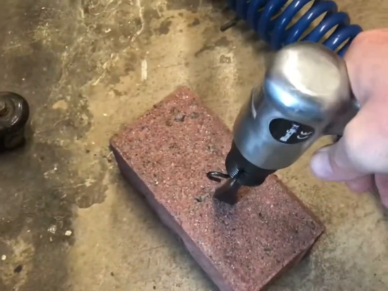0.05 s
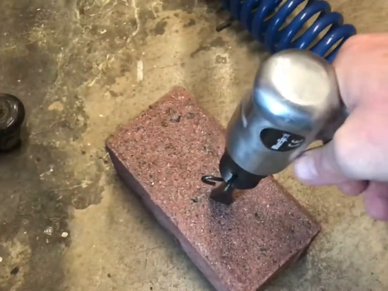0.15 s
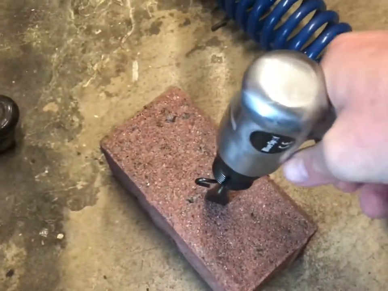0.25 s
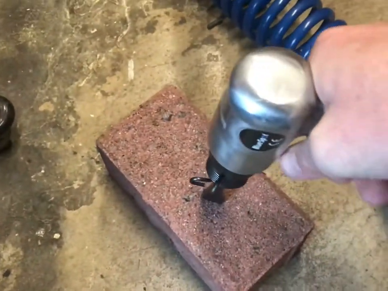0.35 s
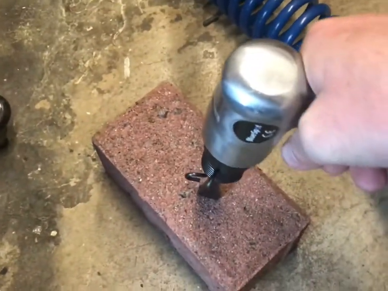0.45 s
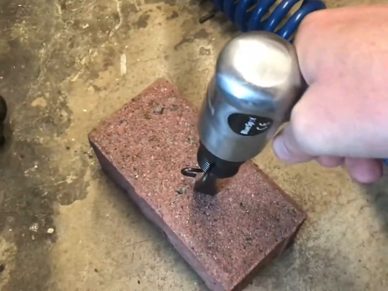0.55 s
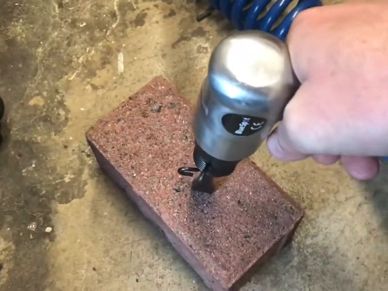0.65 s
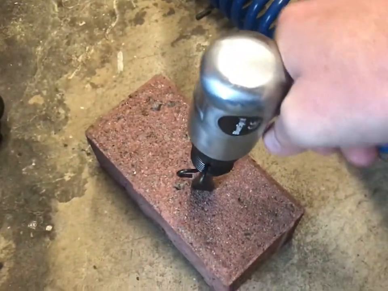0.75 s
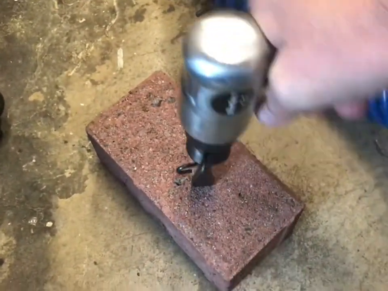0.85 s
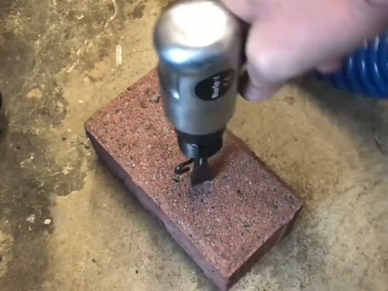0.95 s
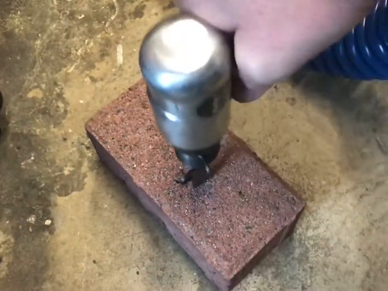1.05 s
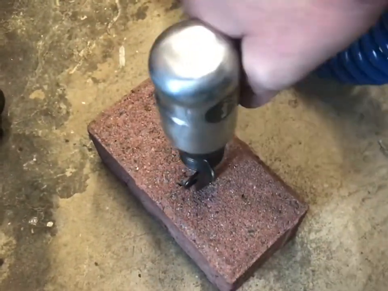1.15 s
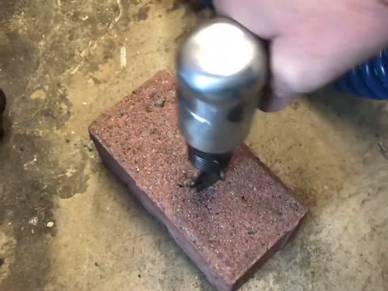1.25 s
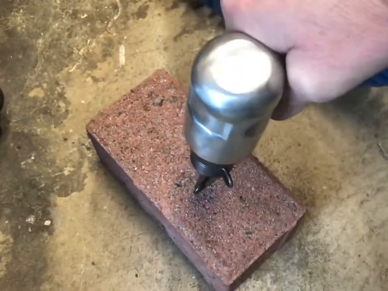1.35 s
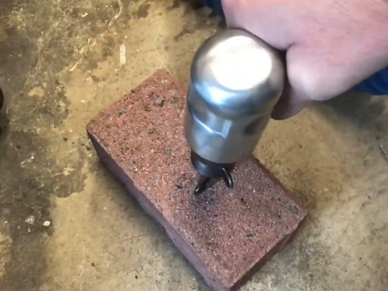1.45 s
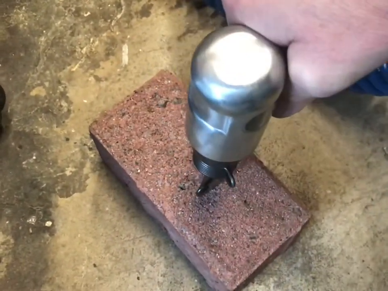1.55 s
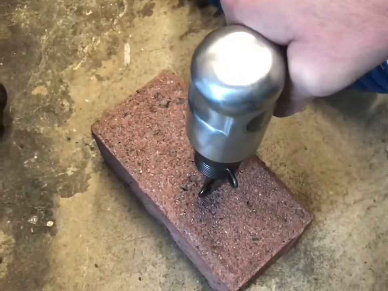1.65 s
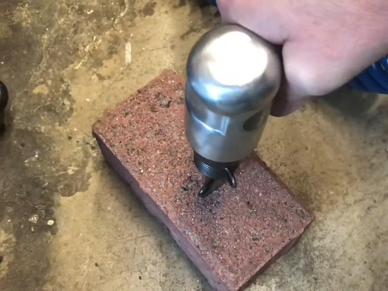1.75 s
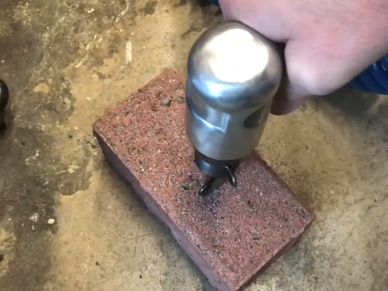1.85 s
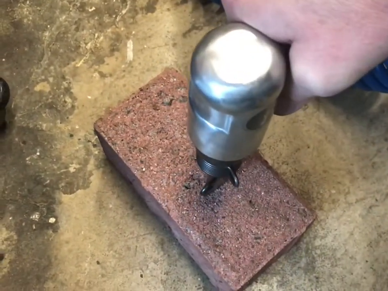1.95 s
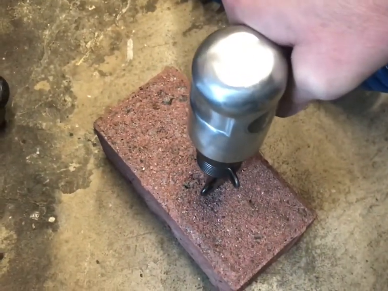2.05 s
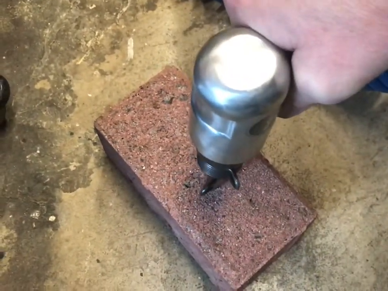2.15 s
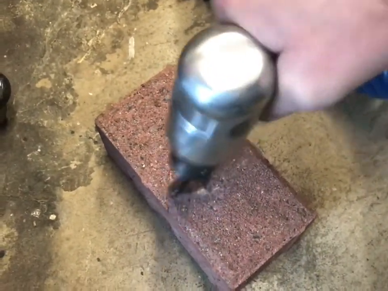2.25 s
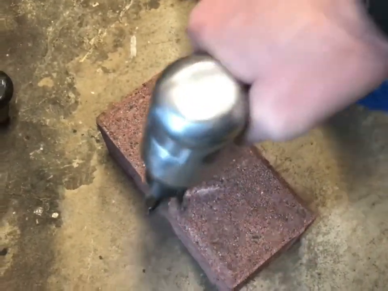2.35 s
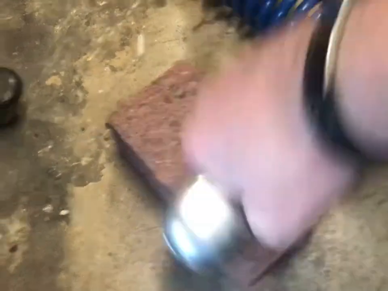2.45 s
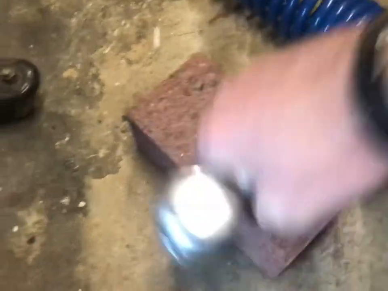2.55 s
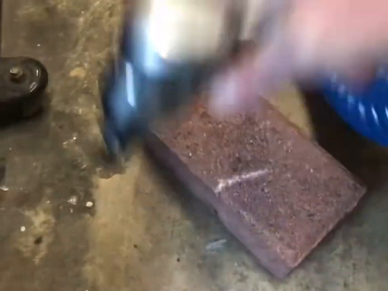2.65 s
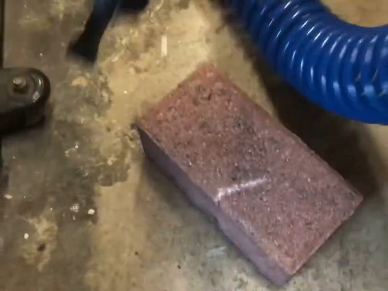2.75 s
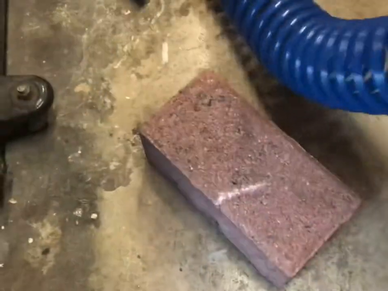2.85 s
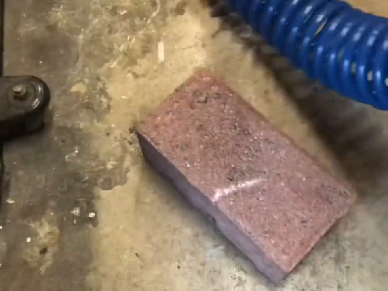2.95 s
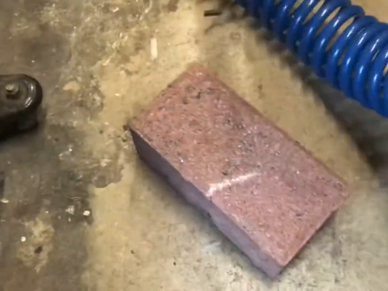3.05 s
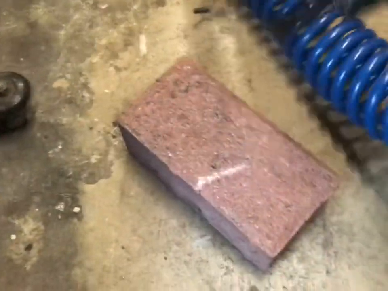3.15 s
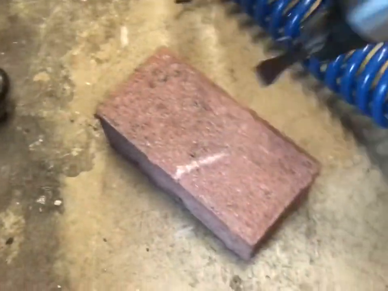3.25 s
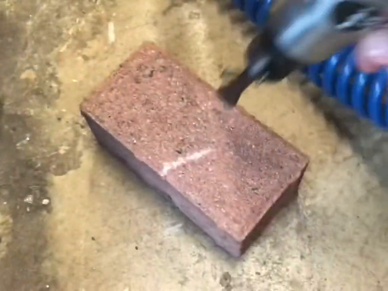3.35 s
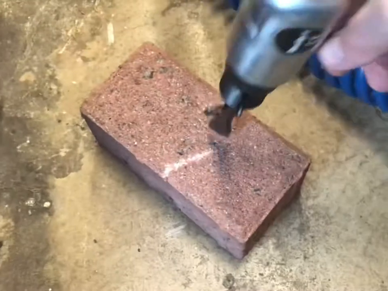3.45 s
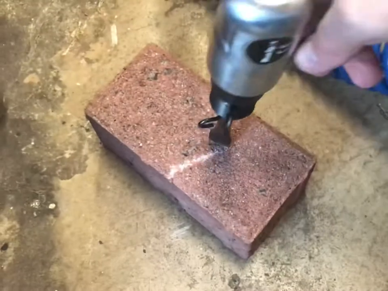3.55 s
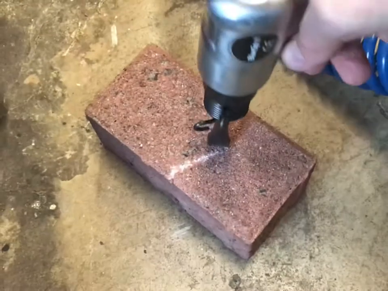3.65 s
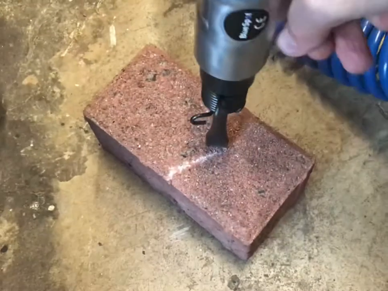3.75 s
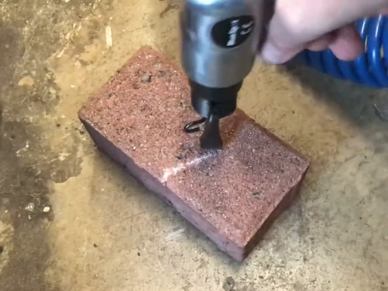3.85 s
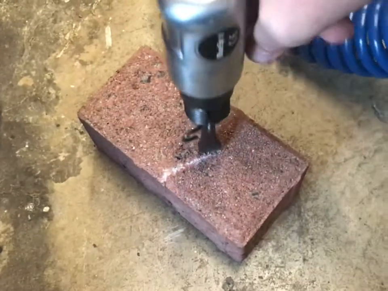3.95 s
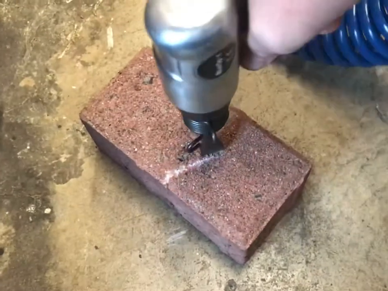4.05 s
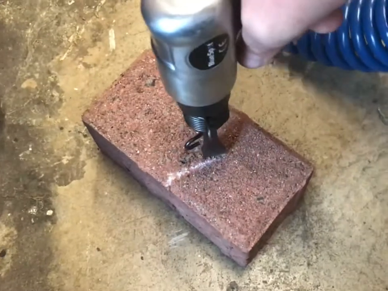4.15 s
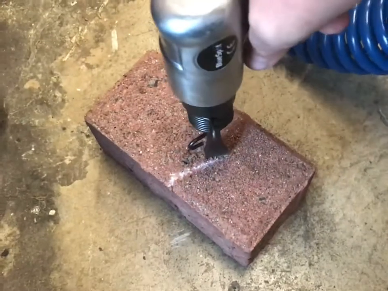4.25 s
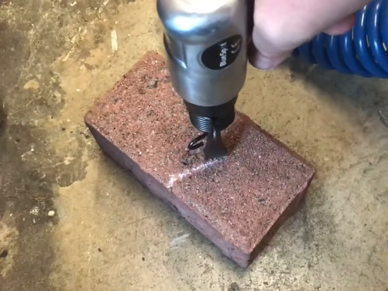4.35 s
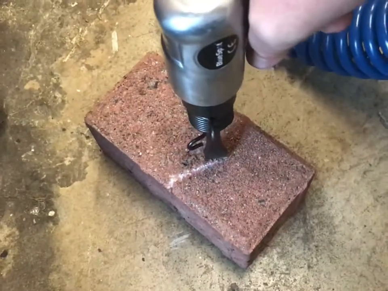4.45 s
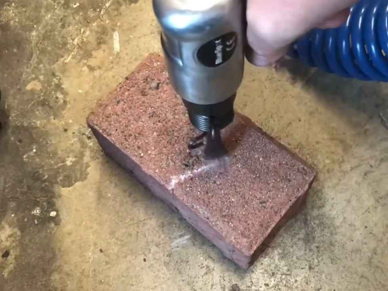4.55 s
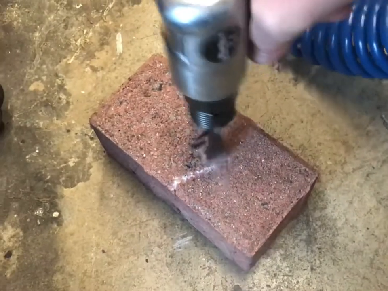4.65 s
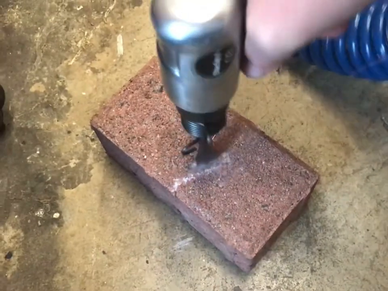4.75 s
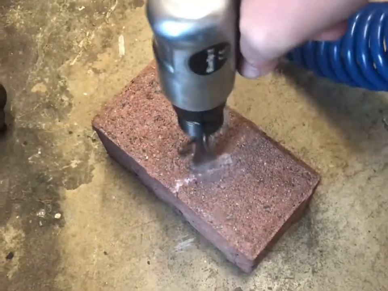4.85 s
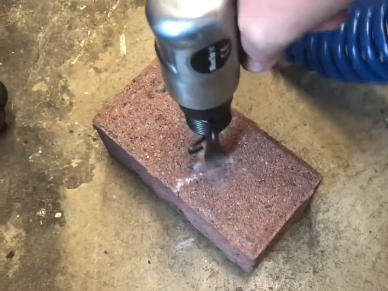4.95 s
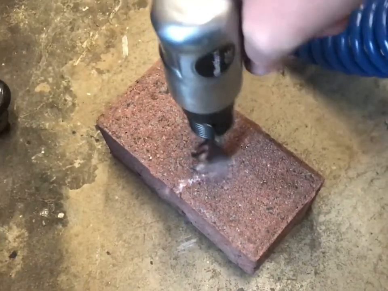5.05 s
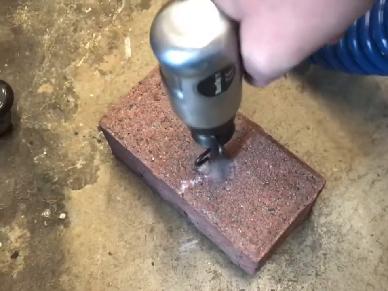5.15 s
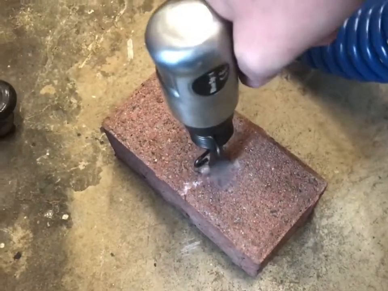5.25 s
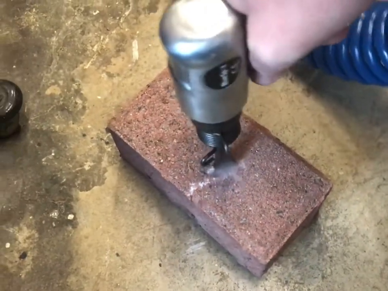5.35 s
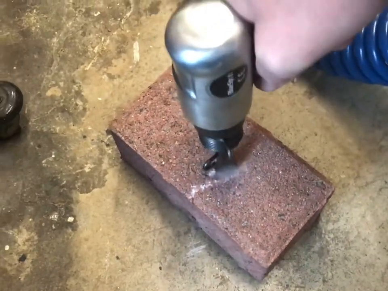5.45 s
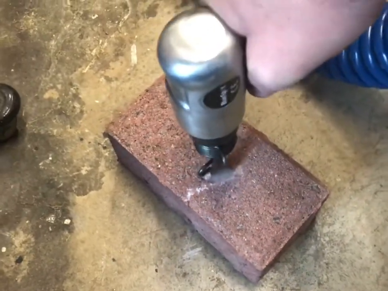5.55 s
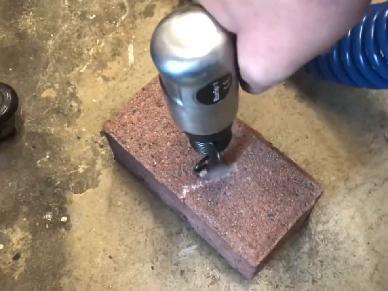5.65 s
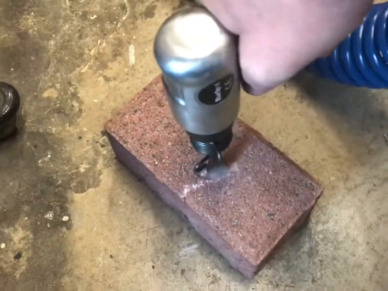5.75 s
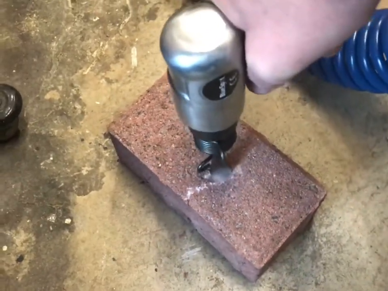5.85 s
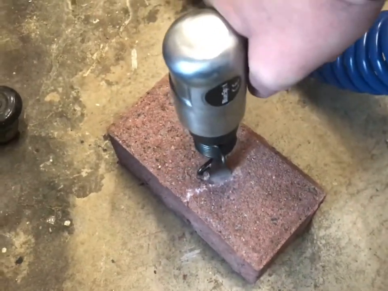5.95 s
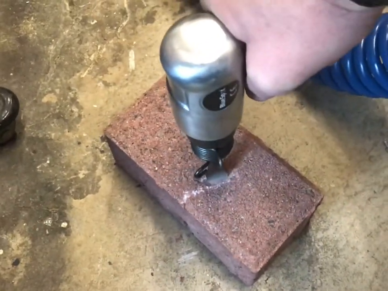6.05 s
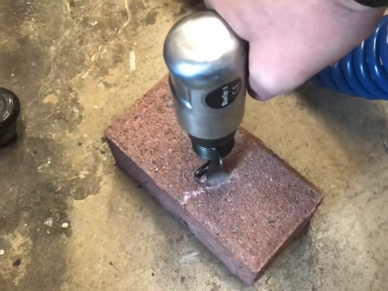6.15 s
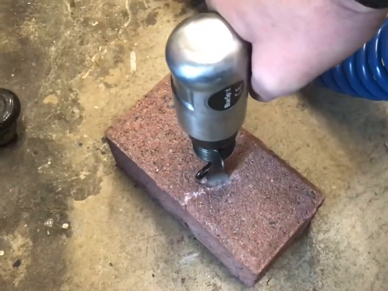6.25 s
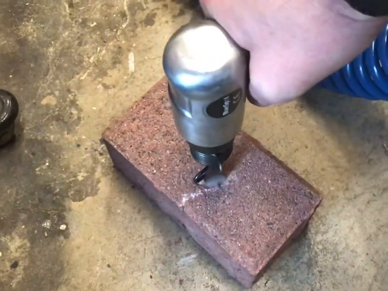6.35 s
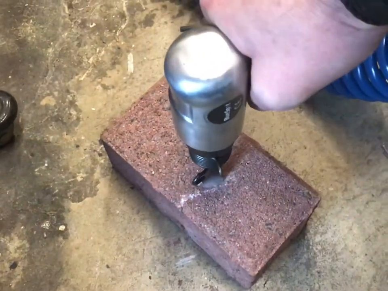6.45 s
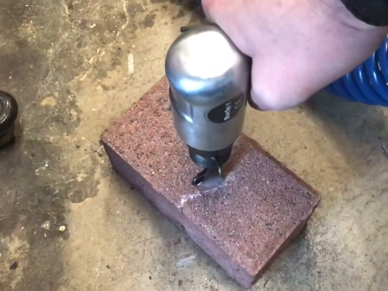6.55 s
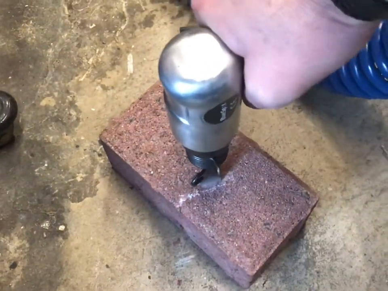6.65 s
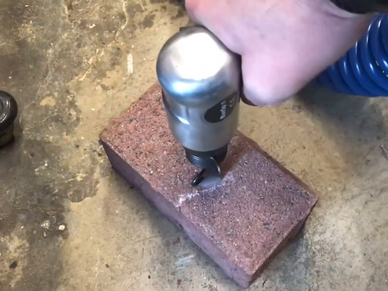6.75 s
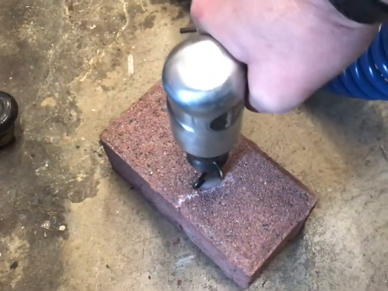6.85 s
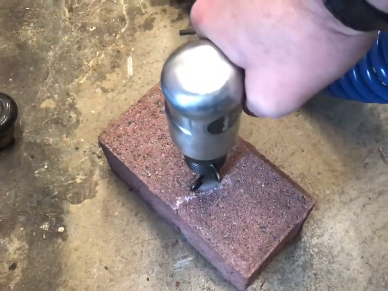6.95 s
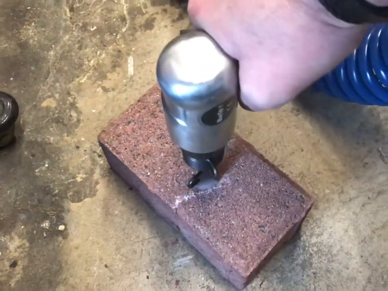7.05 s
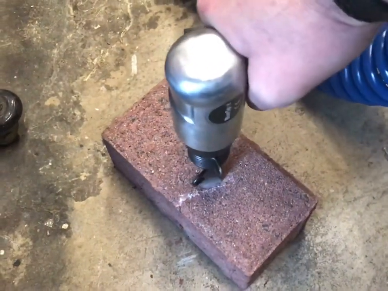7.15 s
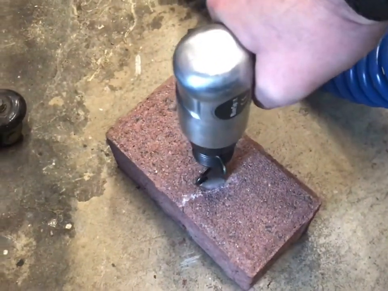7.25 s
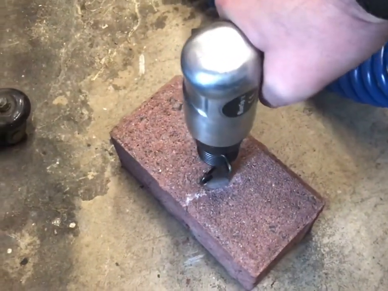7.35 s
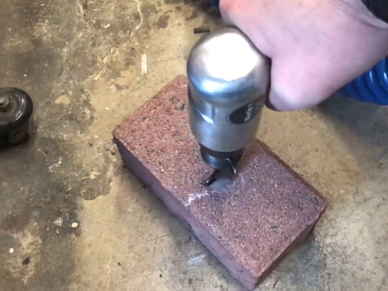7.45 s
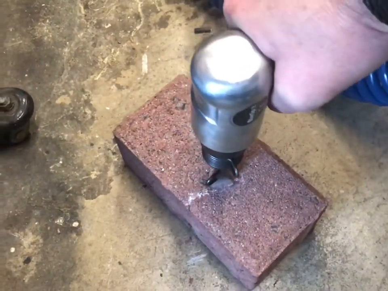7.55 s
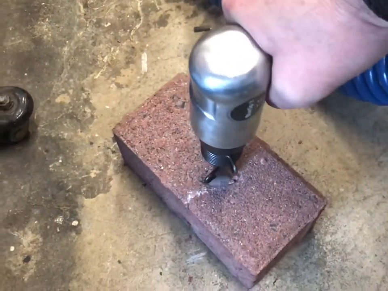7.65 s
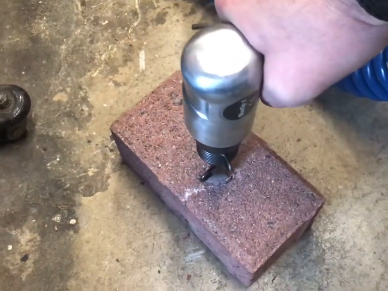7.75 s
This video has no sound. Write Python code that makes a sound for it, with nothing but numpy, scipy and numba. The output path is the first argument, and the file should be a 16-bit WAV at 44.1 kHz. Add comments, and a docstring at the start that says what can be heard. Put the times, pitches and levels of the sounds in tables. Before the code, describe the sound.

A steady, bright hiss of air leaks from a pneumatic chisel resting on a brick, close to a phone microphone in a garage, with a very faint compressor hum beneath. At about 0.9 seconds comes a sharp tick, then a few spurts of air and a thin whistle as the trigger is eased in. From 2.1 to 2.5 seconds the chisel hammers loudly, a very fast rattle of cracks on brick, ringing steel and puffing exhaust. The hiss swells back, shifting in tone as the tool is lifted and lowered, with light taps between 3.5 and 4.1 seconds. From 4.5 to 7.8 seconds it hammers again, its buzzing speed wavering, with slight metallic ringing and chipping around 5 seconds. Each burst starts heavier and slightly squashed, then settles, leaving a brief low boom in the room when it stops.

```python
"""First comes a steady hiss with a few light taps: a leaky air chisel is held on a brick on a garage floor.
Air spurts as the trigger is eased in, then the tool hammers twice, one short burst and one long one.
Each piston blow cracks on the brick, rings the steel and is followed by two puffs of spent air.
A compressor hums faintly. The phone's limiter squashes the start of each burst until its slower
gain control has turned the sound down, and the hiss swells back afterwards."""
import sys
import numpy as np
from scipy import signal
from scipy.fft import rfft, irfft
from scipy.io import wavfile
from scipy.ndimage import uniform_filter1d, map_coordinates
from numba import njit

SR = 44100
rng = np.random.default_rng(int(sys.argv[2]) if len(sys.argv) > 2 else 0)


def dump_mix(stems):
    """Bounce the given channels to the path in sys.argv[1] as a 16-bit WAV at rate SR."""
    frames = np.atleast_2d(stems).T  # one column per channel
    limited = np.clip(frames, -1, 1)  # hard clip at full scale
    pcm = np.round(limited * 32767).astype(np.int16)
    wavfile.write(sys.argv[1], SR, pcm)


N = 343980
T = np.arange(N) / SR

# piston speed through each burst: time_s, blows_per_s
SHORT_BURST = [(2.105, 100), (2.13, 60.5), (2.31, 56), (2.4, 60), (2.52, 53.2)]
LONG_BURST = [(4.472, 64.81), (4.66, 57.67), (5.01, 53.39), (5.16, 59.06), (5.75, 59.6), (5.97, 64.91),
              (6.37, 66.86), (6.44, 64.08), (7.07, 67.63), (7.2, 62.25), (7.67, 61.46), (7.8, 57.37)]
# balance of a blow, one row each for air and crack, brick, head, barrel, blade, steel ring, thump, gust:
# loose_db, seated_db, opening_adds_db, skating_adds_db, groove_adds_db_per_s
BLOW_BALANCE = [ (-19.5, -15.5, 3, 0.1, 0), (-23.5, -21.5, 11.5, 0, -0.8), (-37.5, -25, 8.5, 0.5, 1.9),
                (-28.5, -29.5, 9.5, 2, -0.4), (-27.5, -27, 7, -0.5, -0.7), (-38, -22.5, -4, -16, 0.2),
                (-24.5, -24.5, 6.5, 1, -.5), (-28.5, -33.5, 13, -9, -0.5), ]
# hits within one stroke (tap, main blow, rebound, piston return): delay_s, signed_strength
STROKE_HITS = [(.0002, -0.11), (.0012, -0.68), (.0016, 0.58), (.0064, .34), (.008, -0.16)]
# the notes at which each part rings: pitch_hz, width_hz, relative_db
BRICK_NOTES = [(385.6, 20, 6), (438, 130, -24.5), (553, 84, 6.5), (680, 67, -3), (778, 29, 3.5),
               (967, 50, 1), (1150, 190, -1.5), (1397, 170, -4.5)]
HEAD_NOTES = [(1518, 62, -3.5), (1687, 205, -2), (1807, 200, -5.5)]
BARREL_NOTES = [(2396, 115, 0), (2552, 110, -8), (2760, 160, -10)]
BLADE_NOTES = [(3356, 680, 2), (3560, 57, -9.5), (4220, 103, 1.5)]
STEEL_NOTES = [(9700, 91, -18), (7050, 390, -21), (6450, 143, -20), (13170, 1700, -16.5)]
EXHAUST_NOTES = [(57, 14, -2.5), (128.7, 7.3, 2), (201.8, 23, 2), (216, 51, -6.5)]
VALVE_NOTES = [(1320, 43, -14), (2820, 220, -3), (3300, 190, 5.5), (3920, 480, 7.5), (4440, 115, 5),
               (8450, 490, 4), (13900, 1000, 0)]
# the tone of each noise, from bass to treble: pitch_hz, relative_db
CRACK_TONE = [(200, -31), (900, 7.5), (1700, 6.5), (2080, -38), (2400, -12), (3500, 1), (5000, -2),
              (6800, 4), (7800, -2.5), (9300, 7.5), (10500, 1), (13000, 4), (14300, -16), (16000, 1)]
PUFF_TONE = [(100, 13), (300, 7.5), (1100, 1), (2100, 2), (3400, 1.5), (5000, -4.5), (6800, -0.5),
             (7800, 0.5), (9200, 3.5), (10500, -5.5), (11800, -2), (13000, -4), (14200, 1.5), (16000, -2.5)]
GUST_TONE = [(15, -20), (30, -37), (48, -16), (65, -56), (90, 5), (140, -8), (300, -16.5), (800, -25)]
LEAK_TONE = [(60, -26), (300, -17.5), (750, -13.5), (1150, -2), (2300, -4), (3300, 2), (4300, 2),
             (4900, -2), (6500, 3), (7900, 0), (9500, 3), (10700, -6), (12000, 4), (16000, -5)]
SIZZLE_TONE = [(9000, -42), (10900, 8), (11600, 3.5), (12300, 8.5), (13400, 9), (14400, 5), (15200, 11),
               (16000, -13)]
RUSH_TONE = [(120, -64), (200, -41), (623, -8.5), (696, -15), (867, -6), (1500, -3.5), (1770, 2.5),
             (1940, -5), (2860, -3), (3690, 1.5), (4950, -6.5), (12800, -6.5), (16000, -19.5)]
RUMBLE_TONE = [(20, -12), (45, 9), (85, 5.5), (140, 1.5), (300, -8), (600, 3), (2000, -26.5)]
# the blade catches in the groove: start_s, end_s, pitch_hz, glide_hz_per_s, relative_db
GROOVE_CATCHES = [(2.423, 2.469, 4470, -18000, -20.5), (4.844, 5.045, 3520, -2, -25.5),
                  (5.059, 5.234, 3520, 2596, -26.5)]
# single blows that chip the brick: start_s, relative_db, pitch_hz, width_hz, decay_s
BRICK_CHIPS = [(5.01, -11, 3450, 500, .004), (5.218, -12, 3900, 5000, .002), (5.32, -10, 7000, 7000, .002),
               (5.675, -10, 7000, 7000, .002)]
# a finger takes up the trigger and the valve sings: start_s, end_s, pressure_0_to_1, pitch_hz, level_db
TRIGGER_GRIPS = [(0.91, 2.1, 0.9, 3970, -39), (3.92, 4.24, 0.1, 3160, -38.5)]
# air rushes through the half-open trigger: start_s, end_s, level_db
TRIGGER_SQUEEZES = [(0.938, 1.125, -22.5), (1.188, 1.189, -25.5), (1.235, 1.289, -25)]
# echoes off hand, brick and floor: multiple_of_echo_lag, signed_strength
NEAR_ECHOES = [(0.429, 0.0031), (1, 0.066), (1.27, -0.064), (1.83, 0.07), (2.9, -0.069), (4.3, 0.26)]
# the blade and tool body are set down: start_s, level_db, pitch_hz, width_hz, decay_s
TOOL_TAPS = [(.01, -51, 36, 25, .12), (0.883, -46, 240, 120, 0.026), (0.91, -18.5, 3880, 1200, 0.0054),
             (3.502, -56, 7000, 9000, 0.0011), (3.506, -27, 1297, 900, 0.0058),
             (3.595, -41, 200, 140, 0.018), (3.946, -33.5, 215, 140, 0.012), (4.062, -38, 480, 450, .012)]
# the compressor motor's tones: pitch_hz, level_db
MOTOR_TONES = [(60, -73.5), (113, -94), (231, -71.5), (657, -85), (894, -62)]

LOOSE_BLOWS_PER_S, SEATED_BLOWS_PER_S = 48, 68  # leaning on the tool makes the piston rebound faster
LIFT_S, LOWER_S = 2.45, 3.05  # the tool is lifted and lowered between the bursts


def air_chisel():
    """Piston blows strike brick and steel, spent air puffs out between them, and the garage echoes."""
    air, brick, head, barrel, blade, steel, thump, gust = blow_gains()
    blows = piston()
    running = swell(blows, delay_s=0, rise_s=0.0024, decay_s=0.0048)
    on = running > .1  # the moments when the tool is hammering
    # every stroke makes the same series of hits, roughened by grit under the blade
    push = sum(size * swell(blows, s, rise_s=.00003, decay_s=.00005) for s, size in STROKE_HITS)
    crush = swell(blows, delay_s=0.00067, rise_s=0.00031, decay_s=0.0019)
    contact = unit(push, on) + .4 * unit(crush * rng.standard_normal(N), on)
    crack = air * undb(-1) * unit(crush * noise(CRACK_TONE), on)
    shake = unit(blows, on) + 1.04 * unit(crush * rng.standard_normal(N), on)
    clatter = crack + barrel * unit(ring(shake, BARREL_NOTES), on)
    struck = (brick, BRICK_NOTES), (head, HEAD_NOTES), (blade, BLADE_NOTES), (air * undb(-7), STEEL_NOTES)
    for gain, notes in struck:
        clatter += gain * unit(ring(contact, notes), on)
    clatter += steel * steel_ring(blows, on)
    puffs, thumps, gusts = exhaust(blows, running, on)
    clatter += air * undb(-2) * puffs + caught_blade(blows, on) + knocks(BRICK_CHIPS)
    bass = thump * thumps + gust * gusts
    room_note = ring(bass, [(114, 22, 0)])  # a standing wave at 114 Hz booms on after the tool stops
    boom = undb(-19.5) * garage_echo(room_note, fade_s=0.62, treble_fade_s=0.29, gap_s=0.013)
    echo = undb(-11) * garage_echo(clatter, fade_s=0.2, treble_fade_s=0.2, gap_s=0.0019)
    return clatter + bass + boom + echo


def piston(lead_s=.0014, jitter_s=.00004, scatter_db=.6):
    """One click for each piston stroke, each a little off in time and force."""
    blows = np.zeros(N)
    for burst in (SHORT_BURST, LONG_BURST):
        time_s, rate = np.transpose(burst)
        t = T[(T >= time_s[0]) & (T <= time_s[-1])]
        strokes = np.cumsum(np.interp(t, time_s, rate)) / SR
        blow_s = np.interp(np.arange(int(strokes[-1]) + 1), strokes, t)
        late, force = rng.standard_normal((len(blow_s), 2)).T
        at = ((blow_s - lead_s + jitter_s * late) * SR).astype(int)
        pressure = 1 - np.exp(-(blow_s - time_s[0] + 0.0016) / 0.022)  # builds over the first strokes
        blows[np.minimum(at, N - 1)] = pressure * undb(scatter_db * force)
    return blows


def blow_gains():
    """How strong each part of a blow is as the blade skates, sits firmly and deepens its groove."""
    starts_s = SHORT_BURST[0][0], LONG_BURST[0][0]
    # each burst opens louder and heavier for about a fifth of a second
    opening = sum(held(s, s + 0.15, rise_s=0.11, fall_s=0.097) for s in starts_s)
    seated = seating()
    skating = T < LOWER_S
    cutting_s = np.maximum(T - starts_s[1], 0)
    return [undb(loose + (firm - loose) * seated + boost * opening + skate * skating + wear * cutting_s)
            for loose, firm, boost, skate, wear in BLOW_BALANCE]


def seating():
    """How firmly the blade sits on the brick, 0 to 1; it seats mostly near the piston's top speed."""
    time_s, rate = np.vstack([SHORT_BURST, LONG_BURST]).T
    speed = (np.interp(T, time_s, rate) - LOOSE_BLOWS_PER_S) / (SEATED_BLOWS_PER_S - LOOSE_BLOWS_PER_S)
    return np.clip(speed, 0, 1) ** 1.4


def steel_ring(blows, on, loose_hz=6465, sag_hz=80):
    """Each blow tops up the chisel's main note, which sinks a little as the blade seats."""
    ringing = swell(blows, delay_s=.0014, rise_s=.001, decay_s=.006) * undb(1.2 * drift(45))
    phase = 2 * np.pi * np.cumsum(loose_hz - sag_hz * seating()) / SR + 1.2 * drift(18)
    return unit(ringing * np.sin(phase), on)


def exhaust(blows, running, on):
    """Air leaves after the forward stroke and on the return: it puffs, thumps and buffets the mic."""
    forward = swell(blows, delay_s=0.0025, rise_s=0.00079, decay_s=0.0041)
    back = swell(blows, delay_s=0.00708, rise_s=0.0031, decay_s=0.0059)
    puffs = unit((forward + .6 * back + .33 * running) * noise(PUFF_TONE), on)
    flow_change = np.diff(forward + 0.73 * back, prepend=0)
    thumps = unit(ring(flow_change, EXHAUST_NOTES), on)
    gusts = undb(2 * drift(14)) * unit(running * noise(GUST_TONE), on)
    return puffs, thumps, gusts


def caught_blade(blows, on):
    """The caught blade rings after each blow, gliding in pitch as it works along the groove."""
    struck = unit(swell(blows, delay_s=.0006, rise_s=0.0011, decay_s=0.004), on)
    ringing = 0
    for start, end, hz, glide, db in GROOVE_CATCHES:
        pitch_hz = hz + glide * np.clip(T - start, 0, end - start)
        ringing += undb(db) * held(start, end, 0.037, 0.037) * noise_band(pitch_hz, width_hz=420)
    return struck * ringing


def leaky_valve():
    """Air escapes at the valve, sings under the finger and rushes at each squeeze of the trigger."""
    lift = held(LIFT_S, LOWER_S, rise_s=.2, fall_s=.52)
    grip, whistle = 0, 0
    for start, end, pressure, hz, db in TRIGGER_GRIPS:
        finger = held(start, end, rise_s=.09, fall_s=.09)
        grip += pressure * finger
        whistle += undb(db) * finger * unit(ring(rng.standard_normal(N), [(hz, 150, 0)]))
    hiss = undb(-28 - 2.5 * grip + 0.12 * drift(21)) * noise(LEAK_TONE)
    sizzle = undb(-29 - 2 * grip + lift - 10 * facing_mic() + 0.56 * drift(49)) * noise(SIZZLE_TONE)
    singing_db = -40 + 8.5 * grip - 18 * lift + 1.1 * drift(40)
    singing = undb(singing_db) * unit(ring(rng.standard_normal(N), VALVE_NOTES))
    squeeze = sum(undb(db) * held(start, end, 0.0093, 0.054) for start, end, db in TRIGGER_SQUEEZES)
    rush = squeeze * undb(1.7 * drift(130)) * noise(RUSH_TONE)
    # the tool skids off the brick and the hand shields the valve
    shield_db = -8 * held(2.45, 2.575, rise_s=0.14, fall_s=0.14)
    jet = (hiss + sizzle + whistle + singing + rush) * undb(shield_db)
    return jet + near_echoes(jet, lift)


def near_echoes(jet, lift, resting_ms=1.75, lifted_ms=1.14):
    """Echoes off hand, brick and floor colour the hiss; they come sooner when the tool is lifted."""
    lag_ms = resting_ms + (lifted_ms - resting_ms) * lift + 0.032 * drift(2)
    lag = lag_ms * SR / 1000
    return sum(size * map_coordinates(jet, [np.arange(N) - path * lag], order=2)
               for path, size in NEAR_ECHOES)


def swinging_jet(start_hz=19400, rest_hz=13100):
    """A bright band of hiss sinks into hearing as the tool swings back onto the brick."""
    pitch_hz = rest_hz + (start_hz - rest_hz) * np.exp(-np.maximum(T - 2.9, 0) / 0.33)
    return undb(-30) * facing_mic() * noise_band(pitch_hz, width_hz=3400)


def facing_mic():
    """How far the valve has turned towards the microphone, 0 to 1."""
    return held(start_s=2.9, end_s=4, rise_s=.2, fall_s=.2)


def knocks(rows):
    """Each tap or chip is a short ring of noise that dies away."""
    out = np.zeros(N)
    t = T[:SR // 2]
    for start_s, db, hz, width_hz, decay_s in rows:
        ringing = unit(ring(rng.standard_normal(len(t)), [(hz, width_hz, 0)]))
        start = int(start_s * SR)
        out[start:start + len(t)] += undb(db) * np.exp(-t / decay_s) * ringing
    return out


def garage_echo(x, fade_s, treble_fade_s, gap_s):
    """Many reflections off floor and walls; bass and treble each fall 60 dB in their fade time."""
    t = T[:SR]
    grain = rng.standard_normal(len(t))
    low = signal.sosfilt(signal.butter(1, 2500, fs=SR, output="sos"), grain)
    tail = low * undb(-60 * t / fade_s) + (grain - low) * undb(-60 * t / treble_fade_s)
    tail *= t > gap_s
    return signal.fftconvolve(x, tail / np.sqrt(np.sum(tail ** 2)))[:N]


def compressor():
    """A faint wavering motor hum over the rumble of the room."""
    wavering_s = T + 0.00044 * drift(6.5)
    hum = sum(undb(db) * np.sqrt(2) * np.sin(2 * np.pi * hz * wavering_s) for hz, db in MOTOR_TONES)
    return hum + undb(-57.5) * noise(RUMBLE_TONE)


def undb(db):
    """Turn decibels into a number to multiply by."""
    return 10 ** (np.asarray(db) / 20)


def unit(x, where=slice(None)):
    """Scale to an average (rms) level of 1 over the chosen stretch."""
    return x / np.sqrt(np.mean(x[where] ** 2))


def noise(tone):
    """Noise shaped by a table of pitch_hz, relative_db."""
    hz, db = np.transpose(tone)
    all_hz = np.maximum(np.fft.rfftfreq(N, 1 / SR), 1)
    gain = undb(np.interp(np.log(all_hz), np.log(hz), db))
    return unit(irfft(rfft(rng.standard_normal(N)) * gain, N))


def noise_band(hz, width_hz):
    """A steep-sided band of noise whose centre may move."""
    slow = signal.sosfilt(signal.butter(6, width_hz / 2, fs=SR, output="sos"), rng.standard_normal((2, N)))
    phase = 2 * np.pi * np.cumsum(hz) / SR
    return unit(slow[0] * np.cos(phase) + slow[1] * np.sin(phase))


def ring(x, notes):
    """Let x shake an object that rings at these notes; narrow ones ring longer."""
    return sum(undb(db) * signal.lfilter(*signal.iirpeak(hz, hz / width_hz, fs=SR), x)
               for hz, width_hz, db in notes)


def drift(rate_hz):
    """A smooth random wobble with a size near 1."""
    step = int(SR / rate_hz)
    stairs = np.repeat(rng.standard_normal(N // step + 1), step)
    return unit(uniform_filter1d(stairs, step)[:N])


def swell(blows, delay_s, rise_s, decay_s):
    """A quick rise and a fade, a set time after every blow."""
    t = np.maximum(T[:SR // 10] - delay_s, 0)
    shape = (1 - np.exp(-t / rise_s)) * np.exp(-t / decay_s)
    return signal.fftconvolve(blows, shape / shape.max())[:N]


def held(start_s, end_s, rise_s, fall_s):
    """Rise from 0 towards 1 after the start, hold, and fall back after the end."""
    return np.clip(np.minimum((T - start_s) / rise_s, 1 - (T - end_s) / fall_s), 0, 1)


@njit
def follow(x, rise_per_s, fall_per_s):
    """Follow x, climbing and sinking by at most so much a second."""
    out, level = np.empty(len(x)), 0.
    for i in range(len(x)):
        level += min(max(x[i] - level, -fall_per_s / SR), rise_per_s / SR)
        out[i] = level
    return out


def excess_db(x, limit_db, window_s):
    """How far the running average level stands above a limit."""
    power = uniform_filter1d(x ** 2, int(window_s * SR))
    return np.maximum(10 * np.log10(np.abs(power) + 1e-18) - limit_db, 0)


def scene():
    """The hammering is far louder than everything else."""
    mono = undb(24) * air_chisel() + leaky_valve() + swinging_jet() + knocks(TOOL_TAPS) + compressor()
    return np.array([mono, mono])


def record(dry):
    """A mono phone microphone: bass cut, slow gain control, fast limiter, rounded peaks, top cut."""
    x = signal.sosfilt(signal.butter(4, 34, "high", fs=SR, output="sos"), dry.mean(axis=0))
    duck_db = follow(excess_db(x, limit_db=-12.5, window_s=0.02), rise_per_s=113., fall_per_s=24.)
    x = x * undb(-duck_db)
    squash_db = follow(excess_db(x, limit_db=-7, window_s=0.00059), rise_per_s=1e6, fall_per_s=2200.)
    x = np.tanh(x * undb(-squash_db) / 1.174) * 1.183
    x = signal.sosfilt(signal.ellip(10, .1, 85, 15900, fs=SR, output="sos"), x)
    return np.array([x, x])


dry = scene()
out = record(dry)
dump_mix(out)
```